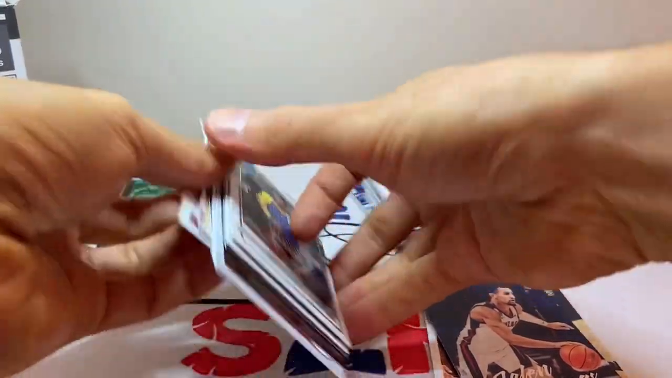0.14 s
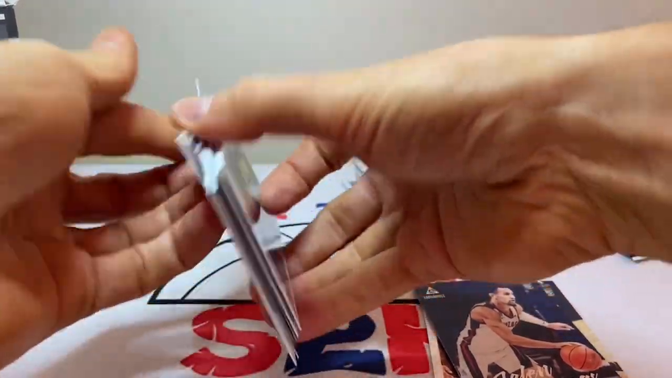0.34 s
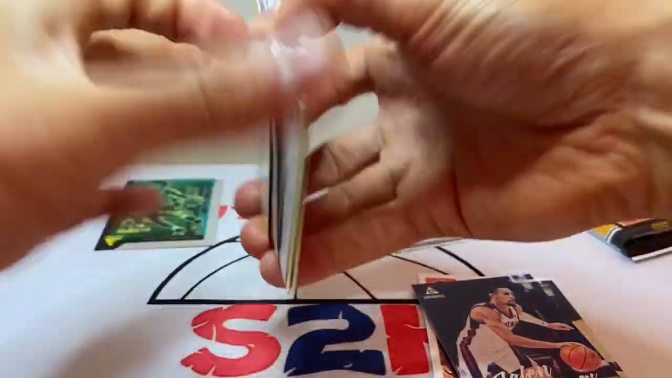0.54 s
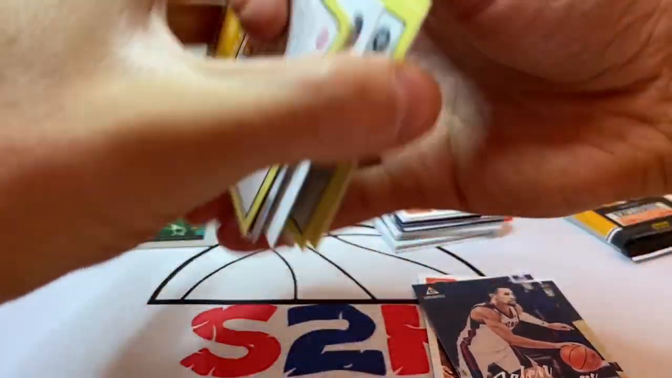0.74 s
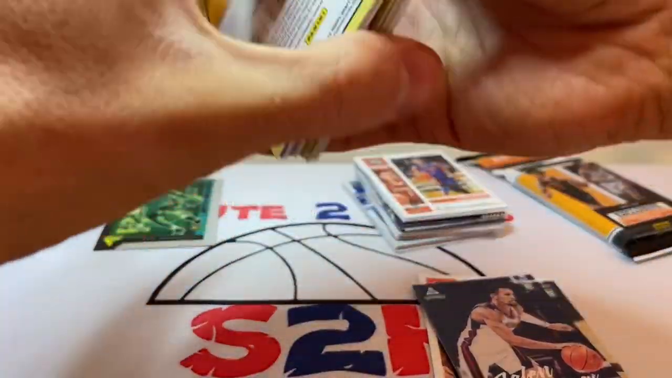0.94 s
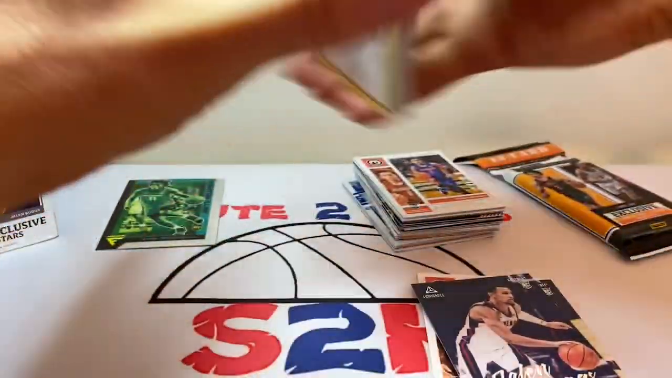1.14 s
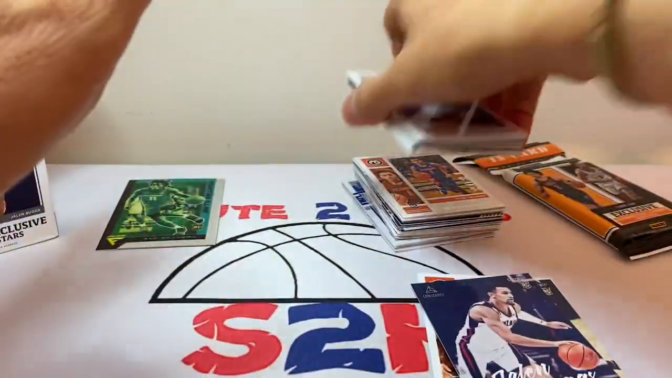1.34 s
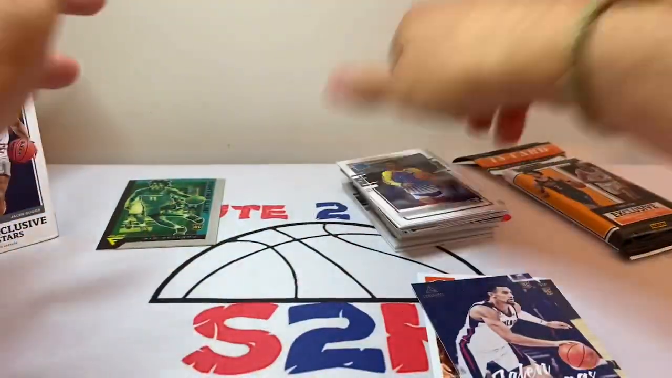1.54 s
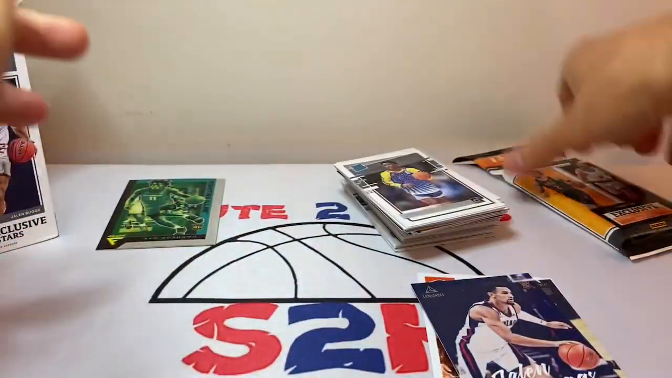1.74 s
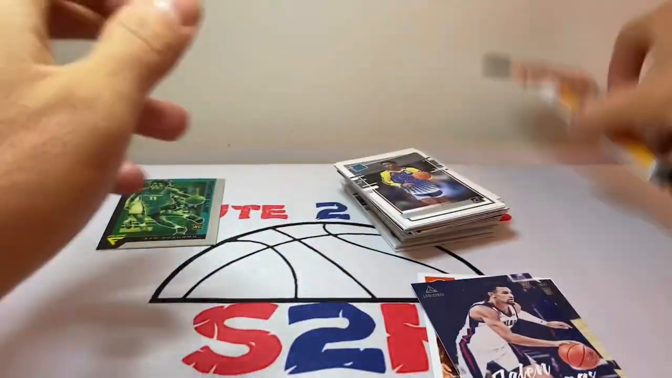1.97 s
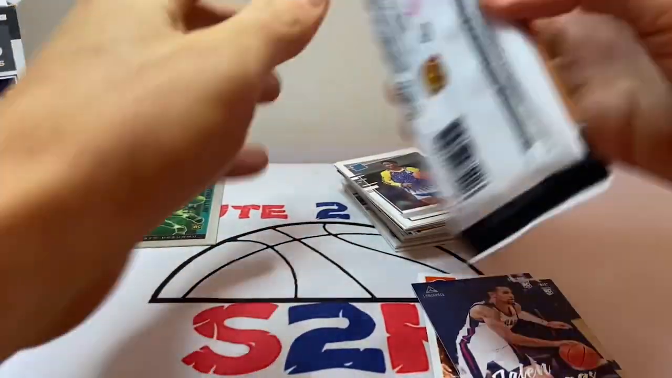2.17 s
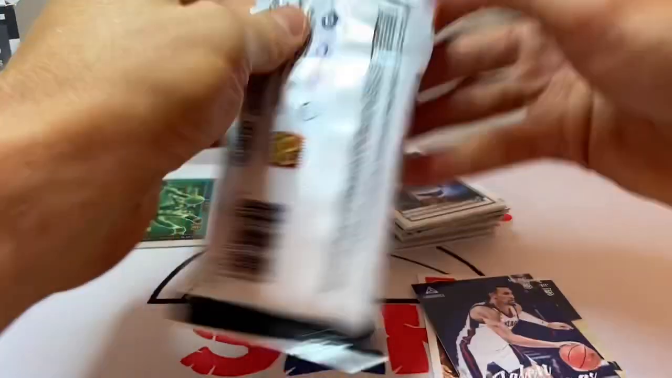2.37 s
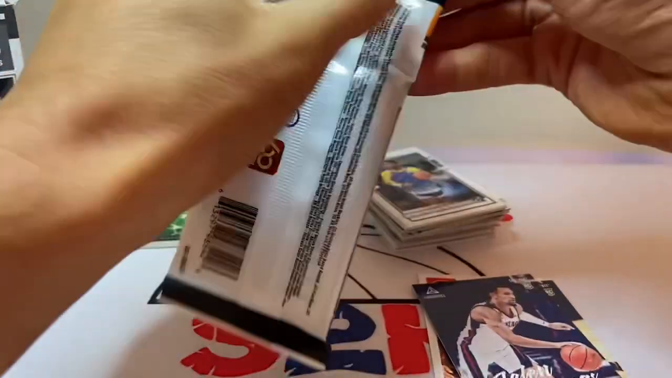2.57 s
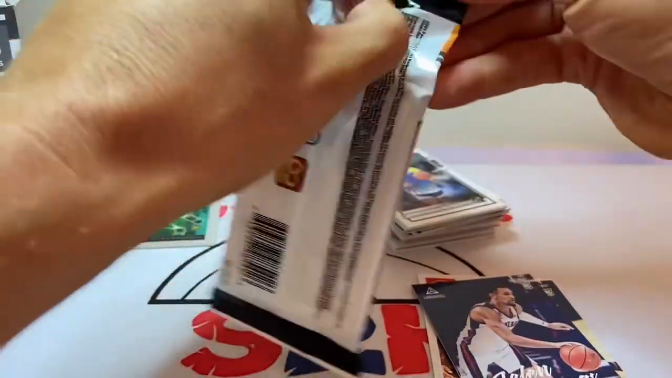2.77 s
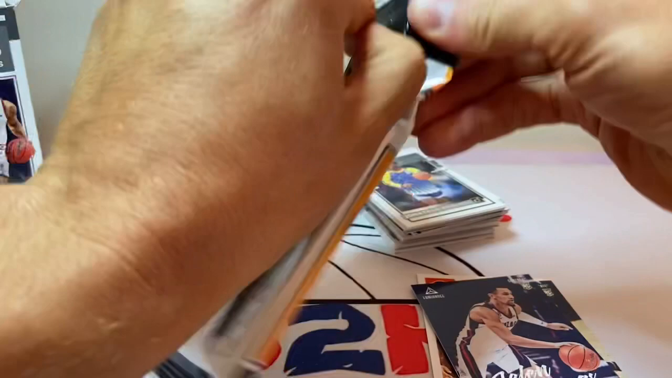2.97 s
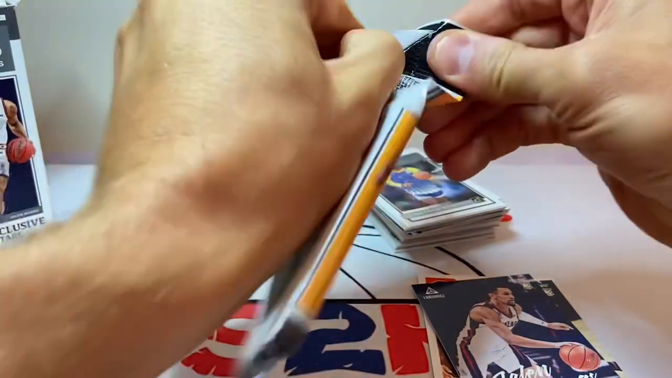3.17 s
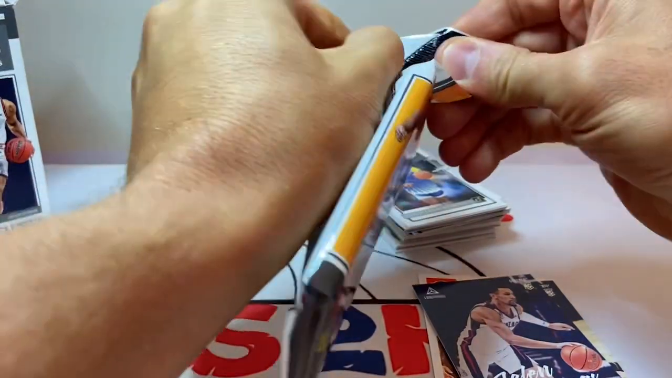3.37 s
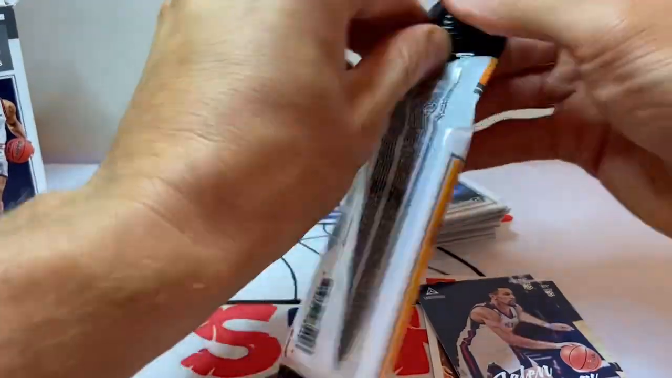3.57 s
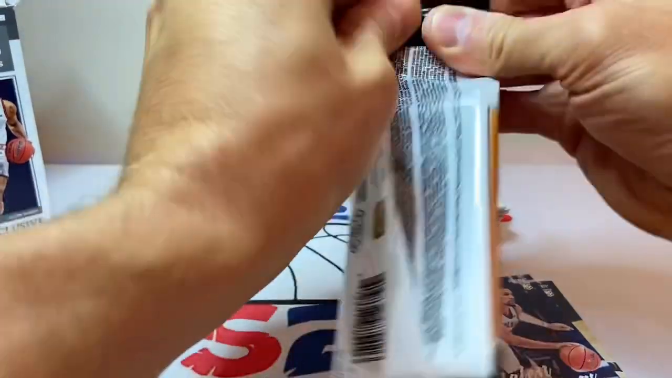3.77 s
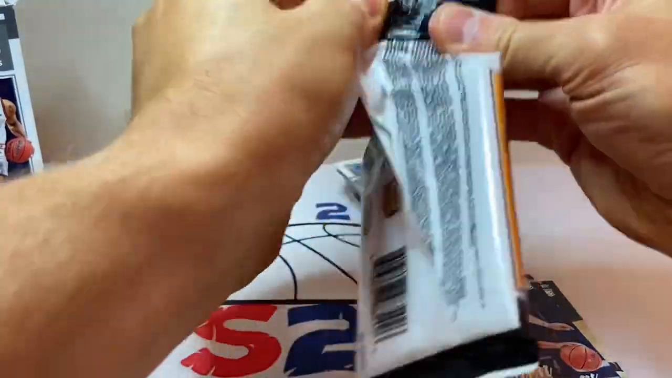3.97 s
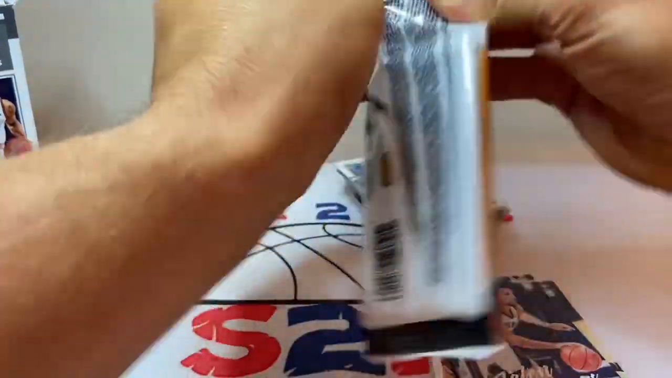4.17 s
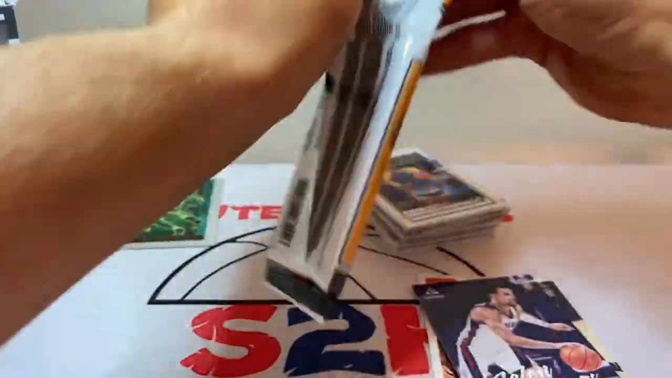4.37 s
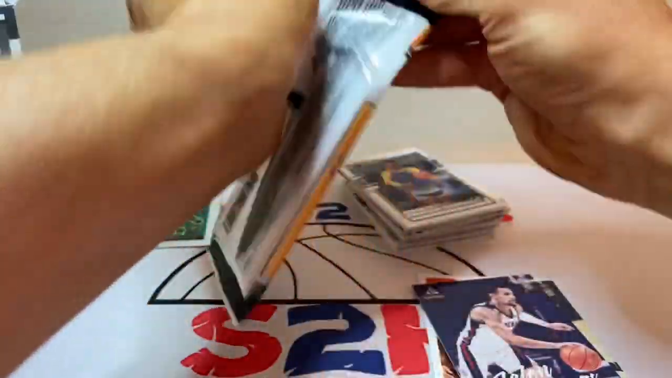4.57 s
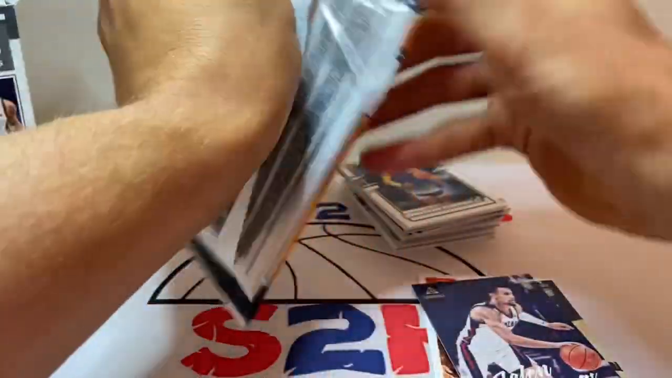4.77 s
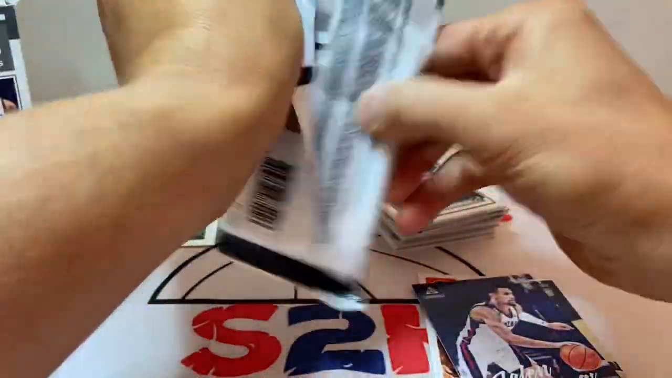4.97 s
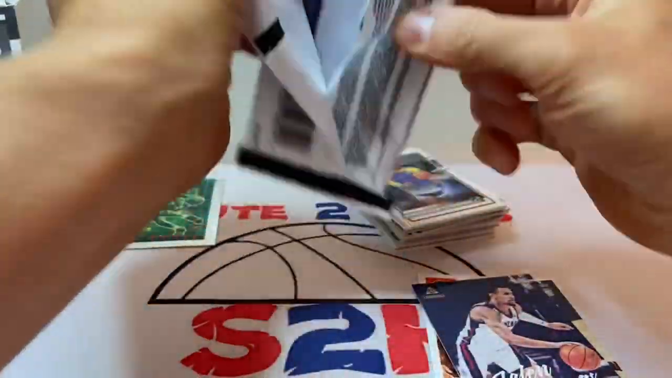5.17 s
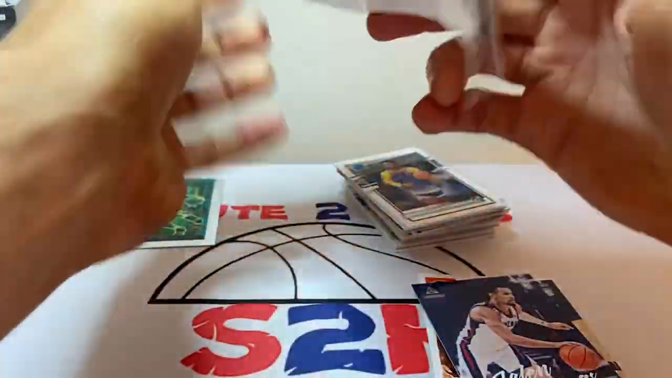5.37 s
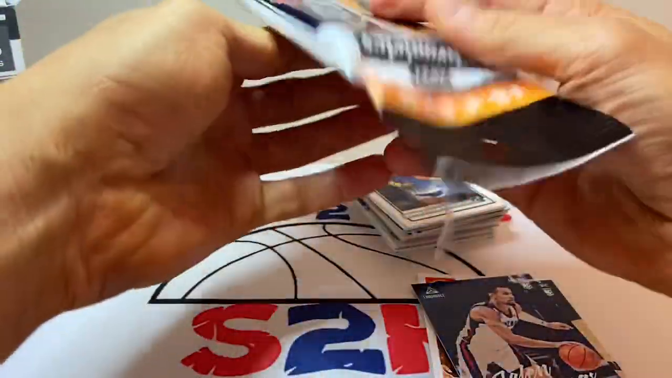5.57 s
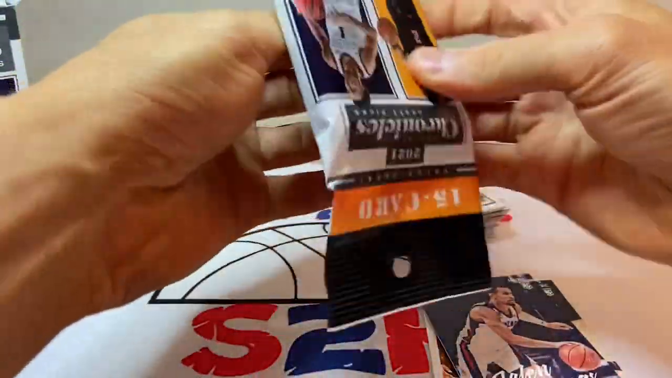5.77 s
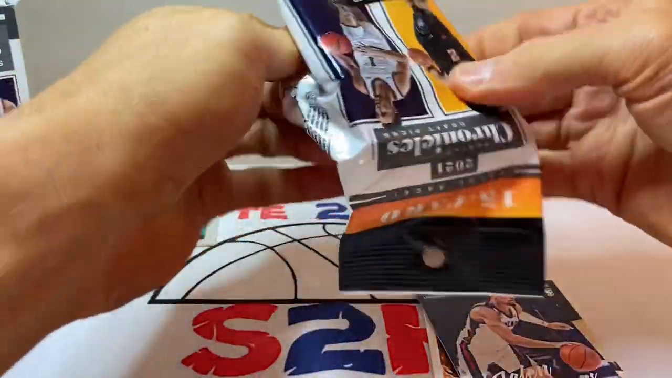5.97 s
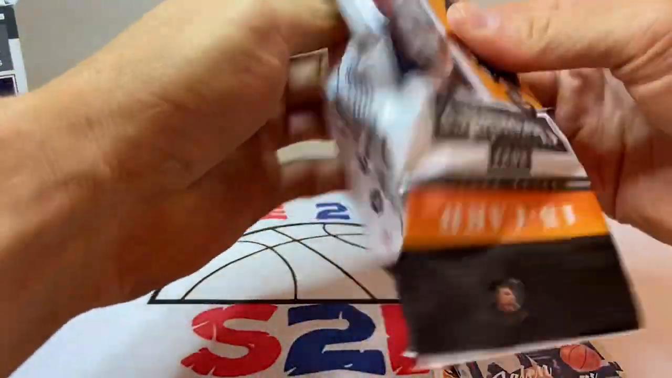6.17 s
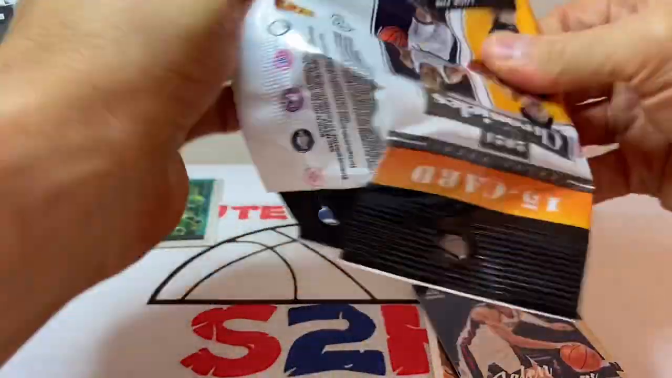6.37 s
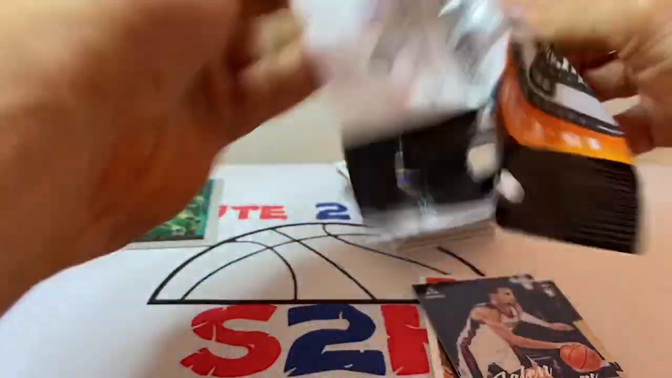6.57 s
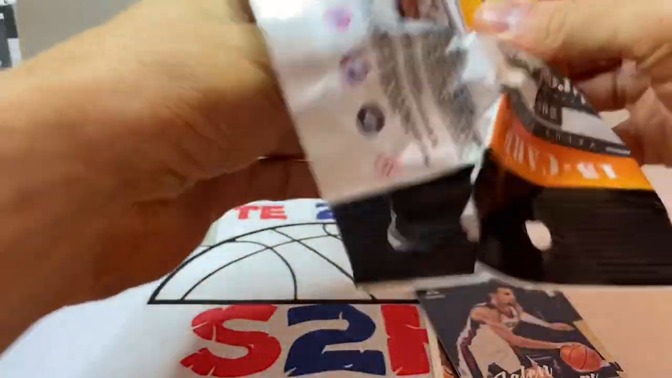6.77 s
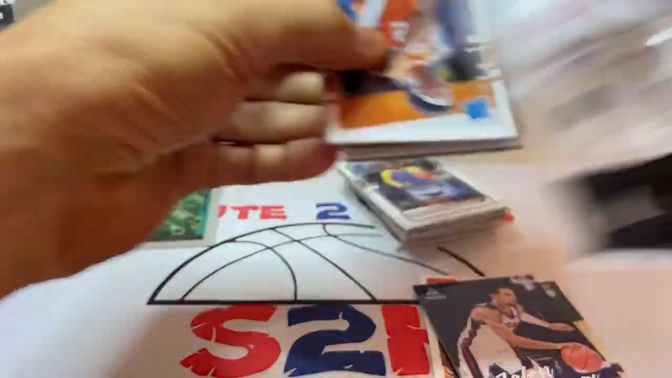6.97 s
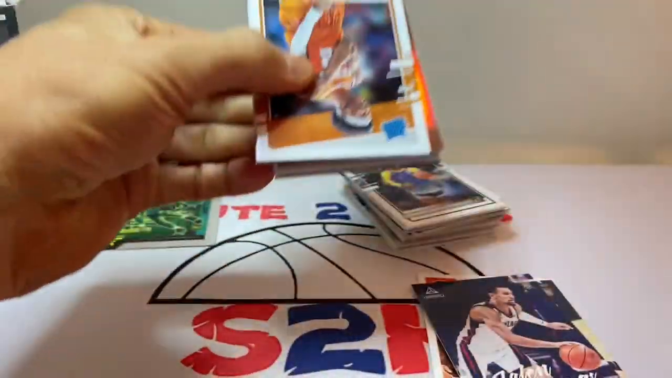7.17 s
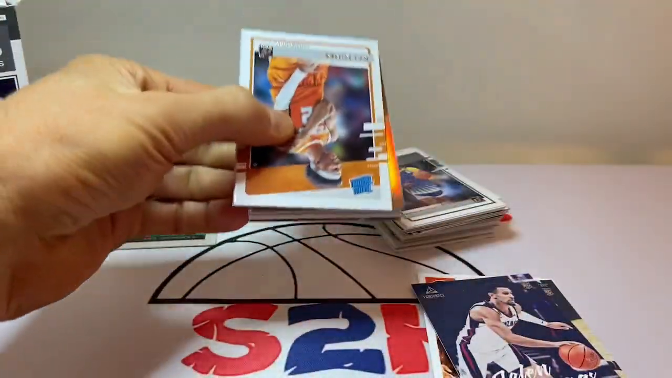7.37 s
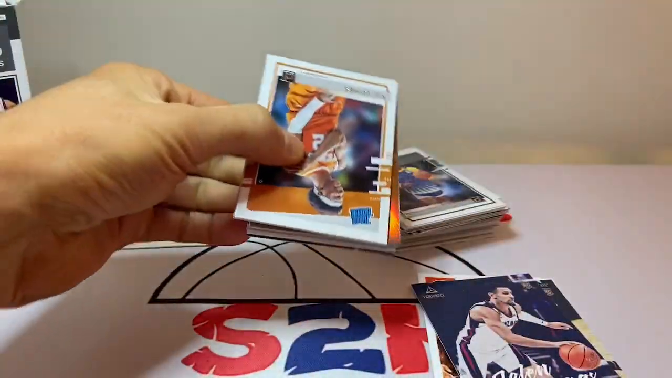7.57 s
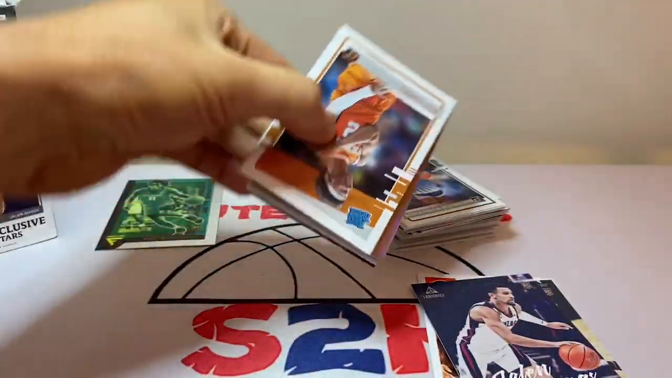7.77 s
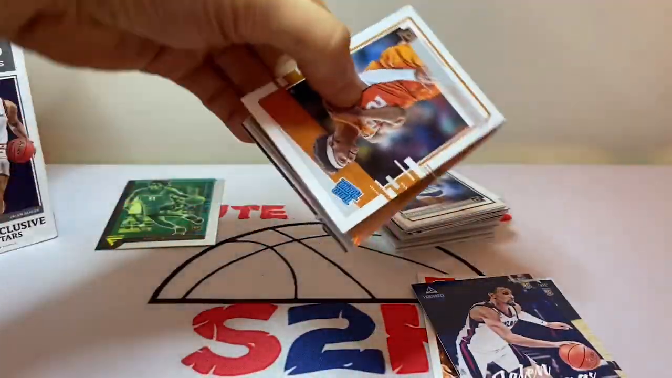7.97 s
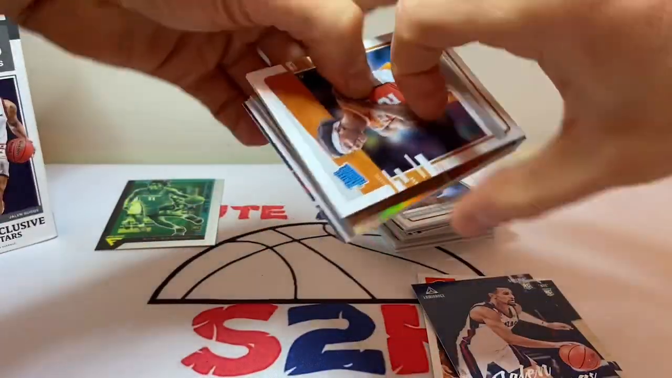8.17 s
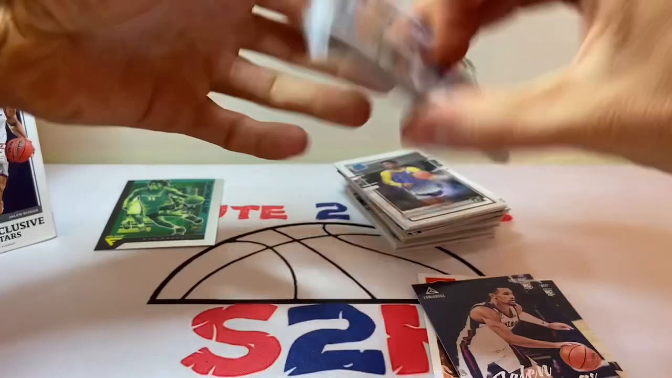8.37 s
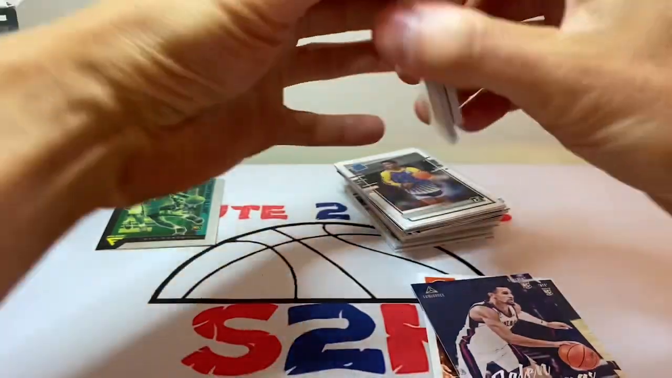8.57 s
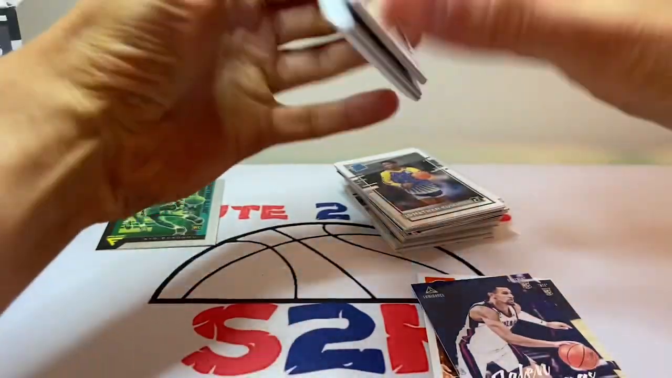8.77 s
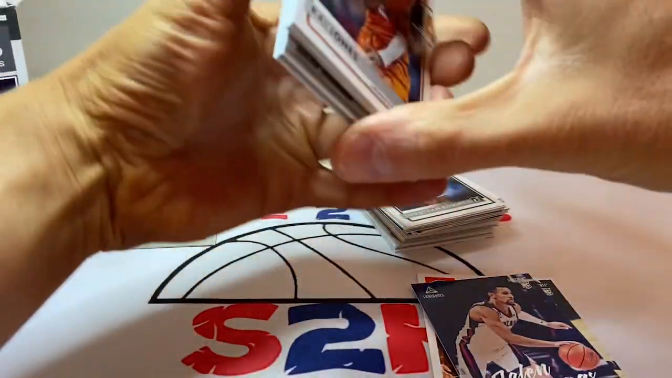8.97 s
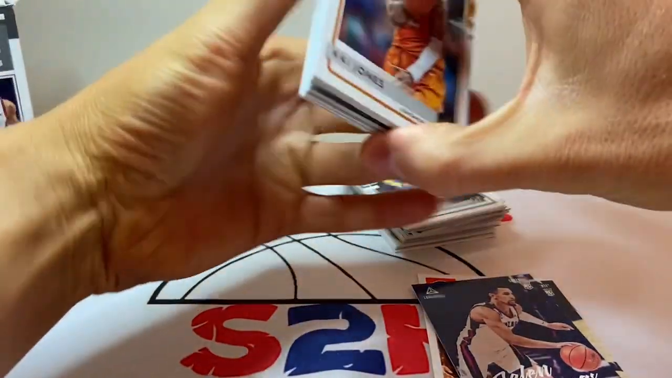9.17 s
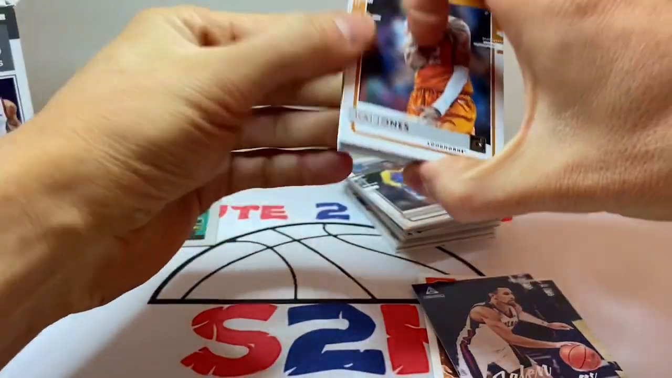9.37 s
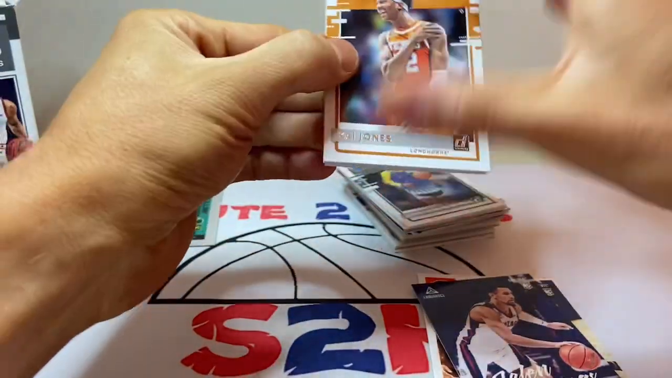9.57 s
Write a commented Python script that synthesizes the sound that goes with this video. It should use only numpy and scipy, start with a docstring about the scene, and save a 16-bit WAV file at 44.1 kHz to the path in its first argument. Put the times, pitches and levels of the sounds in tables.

```python
"""Close to the listener, sliding cards hiss by stick-slip friction, fingers drag, and cards are squared with taps.
A thin ring fades as the cards are lifted away, then blows excite the damped modes of a table.
A cellophane pack follows: creases snap by buckling and ring facets, folds crumple, panels pop and a seam rips.
Last, the wrapper lands further off as swelling noise, cards slide softly and fingertips pat the stack.
A low hush lies beneath throughout, and a small room answers with decaying noise."""
import sys
import numpy as np
from scipy import signal
from scipy.fft import rfft, irfft, next_fast_len
from scipy.io import wavfile
from scipy.ndimage import uniform_filter1d

SR = 44100
rng = np.random.default_rng(int(sys.argv[2]) if len(sys.argv) > 2 else 0)


def wav_record(signal):
    """Record a signal, one row per channel, as 16-bit PCM in the file named by sys.argv[1]."""
    frames = np.transpose(np.atleast_2d(signal))
    bounded = np.clip(frames, -1, 1)
    # unit amplitude maps onto the largest positive 16-bit level
    quanta = np.round(bounded * 32767).astype(np.int16)
    wavfile.write(sys.argv[1], SR, quanta)


N = 425124  # length in samples

# loudest creases of the film snapping through, before the film's colour:
# (t/s, mid-band level/dB, body level re mid/dB, edge level re mid/dB, main facet f/Hz)
SNAPS = [(1.818, -54.5, 9.5, 2.5, 1510), (1.882, -35.5, -3, -2, 1480), (1.891, -39, -7.5, -1, 1900),
         (2.26, -42.5, -25.5, 12.5, 6400), (2.272, -35.5, -4, 13, 7000), (2.301, -24, -4, 6.5, 2400),
         (2.3069, -27, -13, 8, 7370), (2.331, -25, -11.5, 8, 7180), (2.3524, -25, -15.5, 4.5, 6200),
         (2.374, -30, -0.5, -5.5, 1100), (2.4072, -22.5, -4, 2, 4640), (2.421, -28.5, -20.5, 4, 5200),
         (2.433, -35, -7, 2, 4700), (2.501, -32, -19.5, -9, 5860), (2.509, -21, -5, 5.5, 6620),
         (2.519, -33, 9, 11, 6400), (2.603, -25, -9, 2.5, 5070), (2.6283, -24, -12, 6, 7330),
         (2.6384, -32, 0.5, 0.5, 3500), (2.6472, -24, -3.5, 5, 4400), (2.6718, -28, -3, -0.5, 4900),
         (2.7364, -30.5, -5.5, 3.5, 1874), (2.7487, -28.5, -2, 2.5, 3430), (2.772, -19, -7, -2, 2240),
         (2.844, -28, -7, 1, 7000), (2.8611, -28.5, -12, -3, 5300), (2.918, -36, 6, -10.5, 7470),
         (2.924, -32, -2, 5.5, 7600), (2.9539, -29, -2, -9.5, 2850), (3.0415, -33.5, -18, 3.5, 4700),
         (3.0577, -31.5, -12.5, 6, 6130), (3.069, -20, -2.5, 1.5, 5200), (3.0938, -24, 0, -0.5, 1473),
         (3.112, -33.5, -12, 15, 6500), (3.1388, -29, -6, 2.5, 3260), (3.2024, -32, -12, -13, 4690),
         (3.2158, -23, -3.5, 0, 7620), (3.2203, -27, 5.5, 11.5, 7490), (3.233, -30.5, -26, 5, 2920),
         (3.291, -23.5, -5, 4, 3770), (3.3503, -24.5, -12, -5.5, 3430), (3.4418, -44, 5.5, 11.5, 6700),
         (3.464, -32.5, -6, 2.5, 4500), (3.4997, -32, 3, -8, 750), (3.5158, -26.5, -14.5, 7, 7500),
         (3.5346, -22, -4.5, -2.5, 3100), (3.5402, -30, -7, -2.5, 2700), (3.549, -24.5, -2.5, 1, 4300),
         (3.553, -26.5, -6, -1.5, 2400), (3.5905, -29, -9.5, -5, 3283), (3.633, -30, 0, 1, 2900),
         (3.6794, -29.5, 4.5, -14.5, 2400), (3.6931, -22, 1.5, 4.5, 3390), (3.7068, -23.5, -7, 0.5, 2884),
         (3.7419, -30.5, 4.5, 0, 1000), (3.758, -31.5, -8.5, -9.5, 3120), (3.775, -22.5, -18, 3, 5200),
         (3.7779, -26, -27, 3, 2380), (3.784, -20.5, -15, 2, 4960), (3.906, -34.5, 2.5, 1.5, 1700),
         (3.9262, -43, 5.5, 8.5, 7700), (4.081, -37.5, -28, -4, 2350), (4.1243, -42.5, -2.5, 3, 7290),
         (4.161, -26.5, -5, 0.5, 2360), (4.1798, -20.5, -15.5, 4, 5080), (4.2638, -32.5, 1, -4.5, 3020),
         (4.2722, -34.5, -3.5, -11, 2970), (4.286, -33.5, 0, -13.5, 3800), (4.312, -34.5, 0, -2.5, 2230),
         (4.332, -33.5, -15, 3, 4580), (4.3602, -27.5, -10.5, -6.5, 7450), (4.4253, -33.5, 6, -1.5, 948),
         (4.4342, -31, -6.5, -1.5, 2200), (4.4498, -30.5, 1.5, 0, 1300), (4.4794, -25.5, -17.5, 0, 6700),
         (4.4868, -15.5, -21, 3, 6650), (4.5573, -31, -9, 9, 7000), (4.5681, -30.5, -3.5, 2, 7300),
         (4.5965, -23, -12, 3, 7880), (4.628, -24.5, -5.5, -4.5, 3300), (4.6525, -25, -4, -3.5, 3130),
         (4.6742, -33, -3.5, -0.5, 1970), (4.685, -35, 1, -3.5, 2500), (4.7535, -26, 1, 4, 5130),
         (4.7859, -29, 4, 0.5, 817), (4.8449, -25.5, -14, -6, 3720), (4.961, -34.5, -9.5, 0, 5600),
         (5.0368, -29.5, -1, 13.5, 4870), (5.0523, -19, -8.5, 3, 4600), (5.0789, -23.5, -17, -6.5, 4500),
         (5.096, -31, 5.5, 0, 1200), (5.2077, -33, 2.5, -7, 456), (5.241, -35, 13, -1.5, 927),
         (5.28, -19, -7, 0, 6420), (5.3011, -35.5, -0.5, 11, 6540), (5.3739, -25, -8, 4, 6300),
         (5.3778, -29, -2.5, 10, 7140), (5.385, -31.5, -4, 2.5, 7650), (5.5532, -23.5, -7, -1.5, 2450),
         (5.5775, -24, -0.5, -1, 4120), (5.5969, -30, -8.5, 6.5, 7600), (5.6185, -28.5, -10, 1.5, 4780),
         (5.722, -35, 4.5, -10, 800), (5.766, -43.5, -5.5, 5.5, 3600), (5.8018, -35, -6, 0, 7770),
         (5.8084, -31.5, -16.5, 6, 6850), (5.823, -40.5, 4, 11.5, 7500), (5.8429, -28.5, -1.5, -6.5, 5056),
         (5.8607, -22, -4.5, -3, 3100), (5.8982, -27.5, 8, 0.5, 530), (5.91, -28.5, 4.5, 1, 450),
         (5.943, -24.5, -11, 3, 2256), (5.9752, -23.5, -15.5, 2.5, 7400), (6.147, -27.5, 3.5, -14.5, 2230),
         (6.156, -37.5, 0.5, 5, 6700), (6.2393, -28, -9.5, 10.5, 6800), (6.3915, -28.5, -7, 3, 6600),
         (6.4045, -21.5, -2, 6, 4450), (6.4263, -27, -22.5, -0.5, 3670), (6.439, -28, 1, -2, 820),
         (6.452, -20.5, 1.5, -0.5, 2460), (6.475, -31, 6.5, 9, 6900), (6.502, -16.5, -9.5, 1.5, 1960),
         (6.509, -38, -0.5, 0, 3000), (6.54, -29.5, 1.5, 0.5, 1600), (6.5654, -26.5, -2.5, 4.5, 3870),
         (6.5993, -35, -5, -7.5, 2400), (6.677, -31.5, -12.5, 1, 2500), (6.684, -30, 0.5, -4, 450),
         (6.902, -30.5, -35, -4, 2370), (6.9664, -34.5, 5, -9, 2700), (7.0281, -34, 2.5, -4.5, 4600)]
# rips along the seam: (start t/s, end t/s, first level/dB, last level/dB, slip rate/s^-1, main facet f/Hz)
RIPS = [(3.095, 3.108, -27.5, -19.5, 450, 1730), (3.251, 3.349, -34, -41, 194, 6900),
        (3.849, 3.879, -32, -19, 487, 6500), (4.486, 4.543, -26, -18, 560, 5090),
        (4.964, 4.983, -36.5, -18.5, 350, 5320), (5.004, 5.048, -20, -19.5, 480, 3100),
        (5.133, 5.152, -35.5, -36.5, 220, 6200), (5.881, 5.889, -16, -9.5, 620, 3130),
        (6.035, 6.053, -28, -18.5, 440, 479), (6.236, 6.268, -26, -20.5, 390, 1390),
        (6.268, 6.289, -17, -17, 510, 6600), (6.29, 6.326, -14.5, -18.5, 570, 924),
        (6.322, 6.33, -17, -15.5, 590, 1633), (6.64, 6.687, -34.5, -42.5, 460, 2420),
        (6.922, 6.941, -37, -24, 380, 1900)]
# wide panels of the pack popping in or out: (t/s, level of the lowest tone before a shared gain/dB, f/Hz)
POPS = [(1.886, -34, 331), (2.405, -31.5, 324), (2.603, -25, 530), (3.022, -22.5, 315), (3.688, -22, 570),
        (5.01, -10, 411), (5.022, -17, 348.4), (5.278, -25, 445), (5.378, -22, 559), (5.888, -22.5, 520),
        (5.992, -23, 388.7), (6.045, -12, 446), (6.299, -12.5, 334.5), (6.687, -24, 380)]
# knocks on the table: (t/s, peak level/dB, hardness f/Hz: modes above it are barely struck)
KNOCKS = [(1.449, -12, 520), (1.455, -14.5, 150), (1.463, -24, 600), (1.507, -21.5, 110), (1.822, -23, 50),
          (2.074, -39.5, 50)]
# modes of the table: (f/Hz, relative level/dB, t60/s)
TABLE_MODES = [(59, -11.5, 0.26), (77.2, -13, 0.35), (92.4, -5.5, 0.24), (108.4, 3.5, 0.18),
               (179, -10, 0.14), (290, 0.5, 0.092), (412, -2.5, 0.11), (720, -1, 0.028), (934, 9, .035)]
# colour of the snapping film: (f/Hz, level/dB)
FILM_COLOUR = [(100, -9), (300, -2.5), (700, 0.5), (1400, -1), (2600, 5), (4500, 3.5), (7000, 4.5),
               (10000, -2), (13000, -2), (16000, -10.5)]
# colour of the tearing seam: (f/Hz, level/dB)
SEAM_COLOUR = [(80, -10.5), (200, -1.5), (380, -0.5), (700, -3), (910, 0), (1200, -2.5), (3000, -0.5),
               (6000, -2), (10000, -2), (15500, -5)]
# colour of the fine crease ticks: (f/Hz, level/dB)
TICK_COLOUR = [(150, -22.5), (400, 2), (800, -6), (1500, -12), (3000, -2.5), (6000, -4.5), (10000, -10),
               (15500, -19)]
# colour of the fluttering bag: (f/Hz, level/dB)
BAG_COLOUR = [(25, -23.5), (60, 18), (150, 3.5), (400, -9.5), (800, -12.5), (1600, -23), (4000, -47.5)]
# colour of cards rubbing: (f/Hz, level/dB)
CARD_COLOUR = [(200, 1.5), (800, -22.5), (1800, -10), (3300, -7), (6500, -9.5), (10000, -9), (15500, -11.5)]
# colour of brief brushing contacts: (f/Hz, level/dB)
EDGE_COLOUR = [(300, -17.5), (900, 5.5), (2200, 5.5), (4500, 1.5), (8000, -4.5), (15500, -4.5)]
# colour of the room's steady hush: (f/Hz, level/dB)
HUSH_COLOUR = [(20, -20), (35, -8.5), (60, 0.5), (110, -3.5), (185, -16), (270, -13), (400, -17),
               (600, -24), (1000, -28.5), (2000, -31), (5000, -38), (16000, -38.5)]
# decay of the room: (f/Hz, t60/s)
ROOM_DECAY = [(100, 0.74), (530, 0.24), (1400, 0.29), (3700, 0.28), (7000, 0.24), (16000, 0.24)]
# phase between the two microphone ports: (f/Hz, lead of left over right/rad)
PORT_PHASE = [(100, 0), (1000, .2), (1400, .6), (3200, .7), (4300, .1), (7300, 0), (8900, -3.1),
              (10600, -6), (11800, -6.7), (13300, -9.4), (14700, -12.2), (16500, -12.8)]
# level between the two microphone ports: (f/Hz, left re right/dB)
PORT_BALANCE = [(100, .8), (600, 3), (1300, 2.6), (4400, 4), (8000, .5), (15000, 0)]
# cards sliding over each other: (start t/s, end t/s, level at the height of the stroke/dB)
STROKES = [(-.05, 0.017, -52.5), (0.08, 0.252, -61), (0.314, 0.51, -60), (0.637, 0.907, -55),
           (0.912, 1.012, -59), (1.048, 1.09, -57), (7.1, 7.52, -69.5), (8.13, 8.37, -69),
           (8.563, 8.586, -65.5), (8.661, 8.725, -60.5), (9.05, 9.21, -62.5), (9.235, 9.295, -65),
           (9.474, 9.518, -61.5)]
# dull bumps of the hands and the pack: (t/s, peak level/dB)
BUMPS = [(3.587, -31), (4.724, -36.5), (5.244, -24.5), (5.278, -29), (5.898, -26.5), (6.043, -21),
         (6.139, -29.5), (6.306, -24.5), (6.68, -37), (6.934, -28)]
# colour of a bump: (f/Hz, level/dB)
BUMP_COLOUR = [(20, -30), (40, -10), (65, 2.5), (110, -5), (200, -9), (400, -13.5), (900, -35.5),
               (3000, -71.5)]
# fingers squeezing and pulling at the pack: (start t/s, held for t/s, effort level/dB)
SQUEEZES = [(2.29, 0.41, -48), (2.92, 0.11, -42.5), (3.06, 0.052, -35), (3.498, 0.052, -35),
            (3.68, 0.24, -48), (4.21, 0.068, -37), (4.48, 0.25, -35), (4.8, 0.31, -49.5),
            (4.969, 0.091, -30.5), (5.238, 0.084, -39.5), (5.471, 0.087, -53), (5.58, 0.19, -45),
            (5.83, 0.22, -41.5), (6.181, 0.058, -37.5), (6.24, 0.26, -37.5), (6.58, 0.021, -43.5),
            (6.95, 0.045, -57)]
# card edges tapping each other: (t/s, level before band limits/dB, body level re edge/dB)
TAPS = [(0.227, -51.5, -18), (0.611, -50.5, -8), (.658, -40.5, -9), (0.684, -33.5, -13),
        (1.886, -31.5, -7.5), (2.097, -57, -2), (2.166, -45, -11), (2.234, -31.5, -0.5),
        (6.807, -46.5, -13), (7.08, -40.5, -14), (7.093, -39, -1.5), (8.115, -40.5, -3), (8.271, -62, -7),
        (9.012, -62, -2), (9.42, -65, -12.5)]
# cards and pack dragged or slapped briefly over fingers, pile or table:
# (t/s, level before band limits/dB, rise t/s, t60/s, body level re edge/dB, top f/Hz)
SCUFFS = [(.001, -60, 0.0021, 0.52, 0.5, 12000), (0.195, -45.5, 0.019, 0.013, -15, 18000),
          (1.4318, -35, 0.0011, 0.13, -2, 9500), (1.446, -22.5, 0.002, 0.09, 1.5, 1900),
          (1.462, -18.5, 0.0032, 0.017, -25, 1870), (1.799, -48.5, 0.004, 0.19, -0.5, 8100),
          (1.851, -51, 0.027, 0.18, -8, 12200), (6.859, -33.5, 0.1, 0.037, -9.5, 17800)]
# the empty wrapper rustling and landing further off: (t/s, level before band limits/dB, t60/s)
LANDINGS = [(7.233, -47, 0.039), (7.361, -42.5, 0.043), (7.383, -49.5, 0.18), (7.469, -52, 0.087),
            (7.983, -35.5, 0.15), (8.005, -37.5, 0.27)]
# hands and pack dragging: (start t/s, end t/s, level at the height of the stroke/dB)
DRAGS = [(-.03, .45, -67), (1.01, 1.11, -58.5), (1.8, 1.99, -49.5), (2.02, 2.21, -55.5), (2.23, 2.45, -43)]
# colour of the dragging rumble: (f/Hz, level/dB)
DRAG_COLOUR = [(30, -11), (80, 17.5), (140, 1), (200, -9), (290, 3.5), (400, -4), (560, -21), (1200, -30)]
# fingers patting the edge of the card stack: (t/s, peak level/dB)
PATS = [(8.866, -45.5), (8.887, -59), (9.231, -48.5)]
# dull, woody colour of a pat: (f/Hz, level/dB)
PAT_COLOUR = [(120, -3.5), (320, 7.5), (550, 0), (1800, -6), (2800, -10), (15000, -24)]
# partials of the thin ring: (f/Hz, level before the swell/dB, t60/s)
RING_PARTIALS = ((1190, -77, .7), (2333, -73, 1.6), (2914, -80, 1.4))

LOW_CUT_HZ, TOP_HZ = 40, 16200  # bass roll-off and upper band limit of the microphone


def amp(db):
    """Level to gain: 20 dB per factor of ten in amplitude."""
    return 10 ** (np.asarray(db) / 20)


def unit(x):
    """Normalisation to an rms of 1."""
    return x / np.sqrt(np.mean(x ** 2) + 1e-20)


def along(points, hz):
    """Interpolation of (f/Hz, value) points on a logarithmic frequency axis."""
    f, v = np.transpose(points)
    return np.interp(np.log(hz + 1), np.log(f + 1), v)


def add(track, s, sound):
    """Superposition: mix a sound into a track at time s."""
    part = track[:, max(round(s * SR), 0):][:, :sound.shape[-1]]
    part += sound[..., :part.shape[-1]]


def filtered(x, response):
    """Linear filtering: the spectrum of x times a response of frequency."""
    n = x.shape[-1]
    m = next_fast_len(n + 4096)
    return irfft(rfft(x, m) * response(np.fft.rfftfreq(m, 1 / SR)), m)[..., :n]


def coloured(x, points, size=4096):
    """Minimum-phase filter with the gain of the (f/Hz, level/dB) points, so attacks stay sharp."""
    gain = amp(along(points, np.fft.rfftfreq(size, 1 / SR)))
    cepstrum = irfft(np.log(gain))
    # folding the cepstrum onto positive times makes the filter causal
    cepstrum[1:size // 2] *= 2
    cepstrum[size // 2 + 1:] = 0
    impulse = irfft(np.exp(rfft(cepstrum)))
    return signal.oaconvolve(x, impulse[None], axes=1)[:, :x.shape[-1]]


def band(x, lo_hz, hi_hz):
    """Causal Butterworth band-pass."""
    edges = [lo_hz, min(hi_hz, SR / 2 - 1)]
    return signal.sosfilt(signal.butter(2, edges, "band", fs=SR, output="sos"), x)


def pair(shape, side_share=.5):
    """Partly coherent left and right noise (axis before the last), more coherent in the treble."""
    mid, side = np.moveaxis(rng.standard_normal((*shape[:-1], 2, shape[-1])), -2, 0)
    side = side_share * signal.lfilter(*signal.butter(2, 6500, fs=SR), side)
    return unit(np.stack([mid + side, mid - side], axis=-2))


def decaying(x, life):
    """Relaxation: each impulse in x dies exponentially with time constant life/s."""
    return signal.lfilter([1], [1, -np.exp(-1 / (life * SR))], x)


def grains(n, rate, spread_db, life):
    """Shot-noise envelope: slips at random times (rate/s^-1) with scattered sizes, each relaxing."""
    happens = rng.random(n) < rate / SR
    # the cap at 2 trims the largest slips, or the smallest where spread_db is negative
    sizes = amp(spread_db * np.minimum(rng.standard_normal(n), 2))
    return unit(decaying(happens * sizes, life))


def swells(rows):
    """Stroke envelope: a half-ellipse in time for each (start t/s, end t/s, level/dB)."""
    t = np.arange(N) / SR
    gain = np.zeros(N)
    for start, end, db in rows:
        position = (2 * t - start - end) / (end - start)  # -1 at the start, 1 at the end
        gain += amp(db) * np.sqrt(np.maximum(1 - position ** 2, 0))
    return gain


def hush(level_db=-69):
    """Stationary noise: the low, steady hush of the room."""
    return amp(level_db) * unit(filtered(pair((N,)), lambda hz: amp(along(HUSH_COLOUR, hz))))


def slides(shimmer_db=3):
    """Stick-slip friction: glossy cards hiss, shifting in colour as their overlap changes."""
    rub = coloured(pair((N,)) * grains(N, rate=950, spread_db=5.0, life=0.0039), CARD_COLOUR)
    z = signal.stft(rub, nperseg=512)[2]
    # random gains smoothed over frequency and time make the shifting patches
    patches = uniform_filter1d(rng.standard_normal(z.shape[1:]), size=6, axis=0)
    patches = unit(uniform_filter1d(patches, size=12, axis=1))
    hiss = signal.istft(z * amp(shimmer_db * patches), nperseg=512)[1][:, :N]
    return swells(STROKES) * unit(hiss)


def drags():
    """Stick-slip at low rate: hands and pack drag and catch with a loose, lumpy rumble."""
    rumble = coloured(pair((N,)) * grains(N, rate=270, spread_db=-2.5, life=0.019), DRAG_COLOUR)
    return swells(DRAGS) * unit(rumble)


def brushes(contacts, room_db):
    """Transient friction: granular noise swells and dies; returns direct sound and duller room share."""
    out, t = np.zeros((2, N)), np.arange(SR // 3) / SR
    for s, db, rise, t60, body_db, top_hz in contacts:
        rub = pair((len(t),)) * (1 + grains(len(t), rate=600, spread_db=5, life=.0007))
        shape = np.minimum(t / rise, 1) ** 0.65 * amp(-60 * np.maximum(t - rise, 0) / t60)
        edge = unit(coloured(rub, EDGE_COLOUR))
        body = amp(body_db) * unit(band(rub, 260, 850))
        add(out, s, band(amp(db) * shape * (edge + body), LOW_CUT_HZ, top_hz))
    return out, band(amp(room_db) * out, 210, 5200)


def scuffs():
    """Sliding friction: cards and pack are dragged or slapped briefly over a surface."""
    return brushes(SCUFFS, room_db=-14)


def taps(rise=0.00017, t60=0.034, top_hz=19000):
    """Brief contact: card edges tap each other, with an abrupt rise and a short decay."""
    return brushes([(s, db, rise, t60, body_db, top_hz) for s, db, body_db in TAPS], room_db=-9)


def faint_ring(start=1.06, swell=0.025, waver=0.24):
    """Modulated modes: a thin, wavering ring swells and fades as the cards are lifted away."""
    out, t = np.zeros((2, N)), np.arange(SR) / SR
    for hz, db, t60 in RING_PARTIALS:
        level_waver, phase_waver = waver * unit(band(rng.standard_normal((2, SR)), 3, 30))
        shape = amp(db - 60 * t / t60) * (1 - np.exp(-(t / swell) ** 2))
        add(out, start, shape * (1 + level_waver) * np.sin(2 * np.pi * hz * t + 2 * phase_waver))
    return out


def knocks():
    """Modal excitation: blows ring the table, and a soft one reaches only its lowest modes."""
    out, t = np.zeros((2, N)), np.arange(SR // 2) / SR
    hz, db, t60 = np.transpose(TABLE_MODES)[:, :, None]
    for s, level_db, hardness_hz in KNOCKS:
        strength = amp(db) / (1 + (hz / hardness_hz) ** 3)
        turns = hz * t + .15 * rng.standard_normal(hz.shape)  # phases differ a little each time
        ring = (strength * amp(-60 * t / t60) * np.sin(2 * np.pi * turns)).sum(0)
        ring *= 1 - np.exp(-t * hardness_hz)  # the softer the blow, the slower its onset
        add(out, s, amp(level_db) * ring / np.abs(ring).max())
    return out


def squeezing(tighten=549.5, relax=173):
    """Exponential loading and relaxation (rates in dB/s): effort on the pack as a gain."""
    t = np.arange(N) / SR
    efforts = []
    for start, held, db in SQUEEZES:
        before = np.maximum(start - t, 0)
        after = np.maximum(t - start - held, 0)
        efforts.append(db - tighten * before - relax * after)
    return amp(np.max(efforts, axis=0))


def crinkle(effort, fine_db=-2.5, neighbours_db=-15, spread_time=0.0024, bag_db=-14):
    """Random micro-buckling: small creases tick, most around each snap; the bag flutters underneath."""
    near, t = np.zeros((1, N)), np.arange(-SR // 30, SR // 30) / SR
    for s, db, *_ in SNAPS:
        add(near, s + t[0], amp(db + neighbours_db) * np.exp(-abs(t) / spread_time))
    ticks = unit(coloured(pair((N,)) * grains(N, rate=300, spread_db=4.0, life=0.0011), TICK_COLOUR))
    bag = unit(coloured(pair((N,)) * grains(N, rate=84, spread_db=-4.5, life=0.0022), BAG_COLOUR))
    return (amp(fine_db) * effort + near) * ticks + amp(bag_db) * effort * bag


def facets(bursts, main_hz, sharpness=10, spread=.8, count=4, depth=2.66, side_share=0.7):
    """Resonance: a burst rings the facet at its crease and, weaker, a few neighbours of other sizes."""
    hz = np.reshape(main_hz, (-1, 1, 1))
    others = np.sqrt(hz * 2000) * np.exp(spread * rng.standard_normal((count, *hz.shape)))

    def peak(f, centre):
        damping = 1j * f * centre / sharpness
        return damping / (centre ** 2 - f ** 2 + damping)

    return filtered(bursts, lambda f: 1 + depth * (peak(f, hz) + side_share * peak(f, others).sum(0)))


def snaps(crack_life=0.00041, flutter_life=0.0028, lead_time=0.001, lead_in=0.27):
    """Snap-through buckling: a crease creaks, cracks and flutters; returns direct and plainer room sound."""
    t = np.arange(-SR // 200, SR // 50) / SR
    s, db, body_db, edge_db, ring_hz = np.transpose(SNAPS)

    def shape(flutter):
        creak = lead_in * np.exp(-abs(t) / lead_time)
        crack = np.exp(-abs(t) / crack_life) + flutter * np.exp(-abs(t) / flutter_life)
        return np.where(t < 0, creak, crack)

    def levelled(x, level_db):
        # set the level as if all the energy fell within 4.1 ms
        rms = np.sqrt((x ** 2).mean(1).sum(1) / (0.0041 * SR))
        return x * (amp(level_db) / rms)[:, None, None]

    noise = pair((len(s), len(t)))
    plain = noise * shape(flutter=0.8)
    edge = levelled(band(noise * shape(flutter=0.48), 5200, 15000), db + edge_db + 1)
    paths = []
    for sheet in (facets(plain, ring_hz), plain):
        body = levelled(band(sheet, 100, 1600), db + body_db)
        middle = levelled(band(sheet, 920, 6500), db)
        out = np.zeros((2, N))
        for start, click in zip(s, body + middle + edge):
            add(out, start + t[0], click)
        paths.append(coloured(out, FILM_COLOUR))
    return paths


def crumple(effort, gain_db=-9, centre_hz=1350, cycles=1.4, spread_db=5.5, count=750):
    """Damped oscillation: softer folds give way at random, each with a brief low note of its own."""
    out, t = np.zeros((2, N)), np.arange(SR // 40) / SR
    times = rng.uniform(SNAPS[0][0], SNAPS[-1][0], count)
    traits = np.clip(rng.standard_normal((count, 3)), -2, 2)
    for s, (pitch, size, pan) in zip(times, traits):
        turns = centre_hz * np.exp(.55 * pitch) * t
        note = np.sin(2 * np.pi * turns) * np.exp(-turns / cycles) * (1 - np.exp(-2 * turns))
        add(out, s, amp(spread_db * size + np.array([[pan], [-pan]]) * 2) * note)
    return amp(gain_db) * effort * unit(out)


def pops(t60=.028, gain_db=-2, overtone=0.31, rasp=0.26):
    """Bistable plate: a wide panel flips and rings briefly, low and hollow, rasping as it goes."""
    out, t = np.zeros((2, N)), np.arange(SR // 10) / SR
    for s, db, hz in POPS:
        ring = np.sin(2 * np.pi * hz * t)
        ring = ring + overtone * np.sin(2 * np.pi * hz * rng.uniform(1.4, 2.1) * t)
        ring = ring + rasp * unit(band(pair((len(t),)), hz / 2, 4 * hz))
        add(out, s, amp(db + gain_db - 60 * t / t60) * (1 - np.exp(-t / 0.00028)) * ring)
    return out


def rips(jitter=0.3, spread_db=3.0, slip_life=0.0007):
    """Progressive fracture: the crimped seam gives way rib by rib in a fast, uneven train of slips."""
    out = np.zeros((2, N))
    for start, end, first_db, last_db, rate, ring_hz in RIPS:
        n = max(int((end - start) * SR), 2)
        timing, size = rng.standard_normal((2, SR // 400))
        gaps = np.exp(jitter * timing)
        at = (np.cumsum(gaps) - gaps[0]) * SR / rate  # samples; the first slip is at 0
        sizes = amp(spread_db * np.minimum(size[at < n], 1))
        slips = np.bincount(at[at < n].astype(int), sizes, SR // 5)
        rip = coloured(pair((len(slips),)) * decaying(slips, slip_life), SEAM_COLOUR)
        rip = facets(rip[None], ring_hz, sharpness=19)[0]
        rip /= np.sqrt(np.mean(rip[:, :n] ** 2))
        add(out, start, rip * amp(np.interp(np.arange(len(slips)), [0, n], [first_db, last_db])))
    return out


def bumps(swell=.005):
    """Overdamped impulse: hands and pack jolt with a low push and no ring."""
    out, t = np.zeros((2, N)), np.arange(SR // 6) / SR
    for s, db in BUMPS:
        push = coloured(rng.standard_normal((1, len(t))) * t * np.exp(-t / swell), BUMP_COLOUR)
        add(out, s, amp(db) * push / np.abs(push).max())
    return out


def landings(rise=0.0067, body_db=-10, top_hz=7660):
    """Distance dulls treble: the empty wrapper rustles and lands further off."""
    return brushes([(s, db, rise, t60, body_db, top_hz) for s, db, t60 in LANDINGS], room_db=-4.5)


def pats(t60=0.039):
    """Heavily damped block: the stack answers a fingertip with a short, low knock."""
    out, t = np.zeros((2, N)), np.arange(SR // 10) / SR
    for s, db in PATS:
        pat = coloured(pair((len(t),)) * amp(-60 * t / t60), PAT_COLOUR)
        add(out, s, amp(db) * pat / np.abs(pat).max())
    return out


def room(x, build_up=0.0017, count=40):
    """Reverberation: the echoes are random noise tails that die sooner in the treble."""
    out = np.zeros((2, N))
    hz, t, z = signal.stft(pair((count, SR // 2)), SR, nperseg=1024)
    decay = amp(-60 * t / along(ROOM_DECAY, hz)[:, None])
    tails = signal.istft(z * decay, SR, nperseg=1024)[1]
    tails = tails * (1 - np.exp(-np.arange(tails.shape[-1]) / SR / build_up))
    # each successive stretch of sound gets a fresh random tail, so no fixed resonance builds up
    for part, tail in zip(np.array_split(np.arange(N), count), tails):
        echo = signal.fftconvolve(x[:, part], tail / np.linalg.norm(tail[0]), axes=1)
        add(out, part[0] / SR, echo)
    return out


def scene(room_db=-12, table_room_db=-24):
    """Superposition of direct and reverberant sound; the small pack sends little bass into the room."""
    effort = squeezing()
    close = slides() + drags() + crinkle(effort) + crumple(effort) + pops() + rips() + bumps() + pats()
    snaps_near, snaps_far = snaps()
    scuffs_near, scuffs_far = scuffs()
    taps_near, taps_far = taps()
    landings_near, landings_far = landings()
    brushes_near = scuffs_near + taps_near + landings_near
    brushes_far = scuffs_far + taps_far + landings_far
    table = knocks()
    pack_send = amp(room_db) * band(close + snaps_far, 330, 12000)
    echo = room(pack_send + brushes_far + amp(table_room_db) * table)
    return hush() + close + brushes_near + faint_ring() + table + snaps_near + echo


def record(dry):
    """Two-port reception: ports differ in level and phase; deep bass and the top of the band are cut."""
    sides = np.array([[.5], [-.5]])  # each port takes half the difference
    dry = signal.sosfilt(signal.butter(3, LOW_CUT_HZ, "high", fs=SR, output="sos"), dry)

    def ports(hz):
        balance = amp(sides * along(PORT_BALANCE, hz))
        phase = np.exp(1j * sides * along(PORT_PHASE, hz))
        return balance * phase / np.sqrt(1 + (hz / TOP_HZ) ** 120)

    return filtered(dry, ports)


dry = scene()
out = record(dry)
wav_record(out)
```